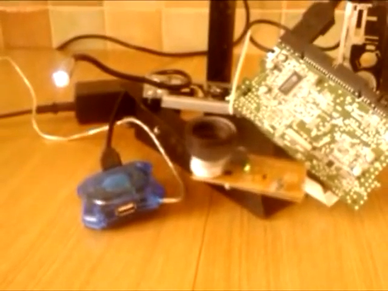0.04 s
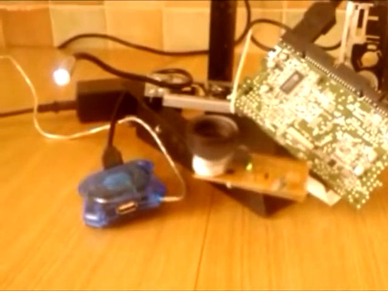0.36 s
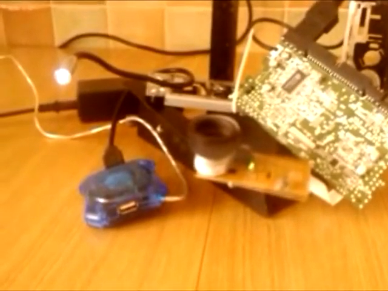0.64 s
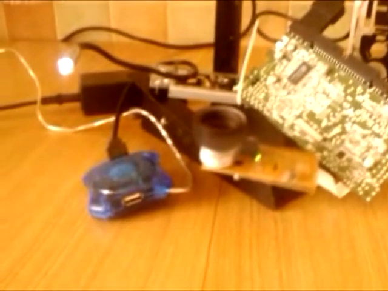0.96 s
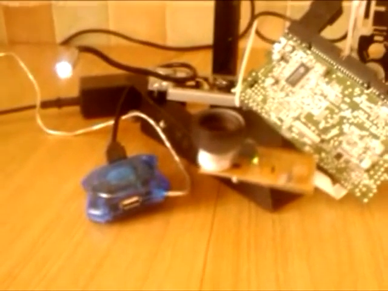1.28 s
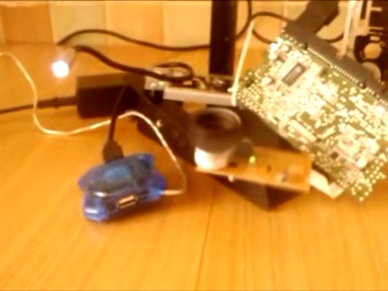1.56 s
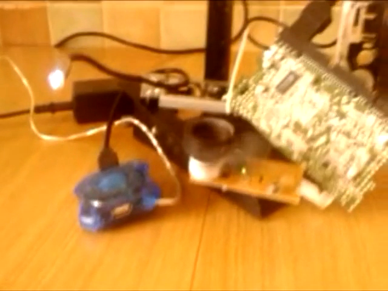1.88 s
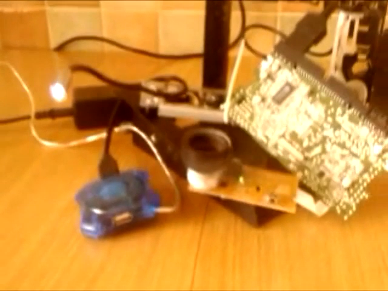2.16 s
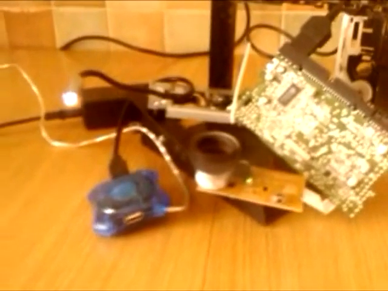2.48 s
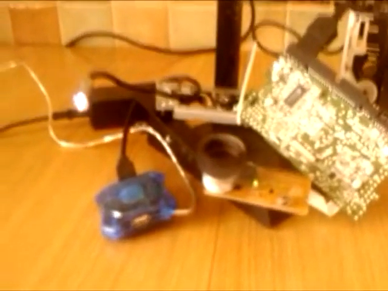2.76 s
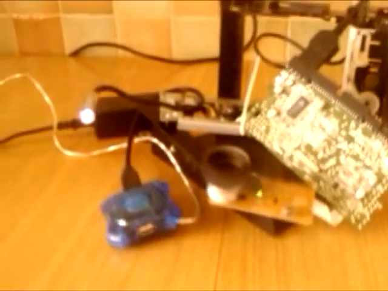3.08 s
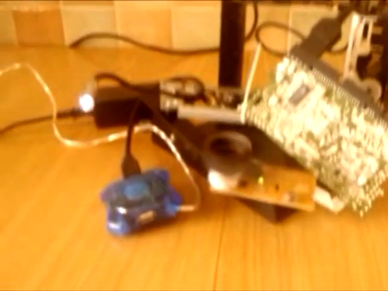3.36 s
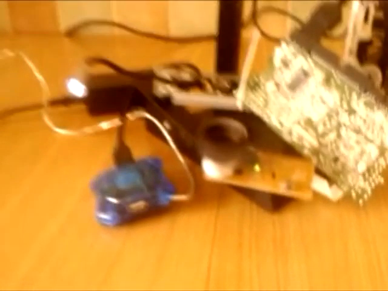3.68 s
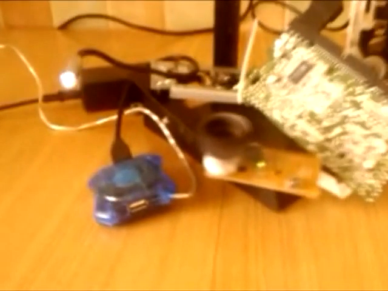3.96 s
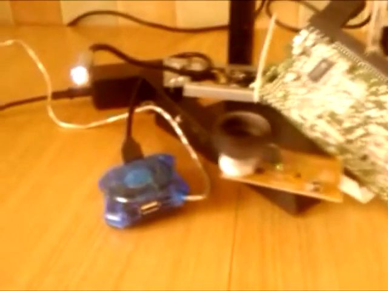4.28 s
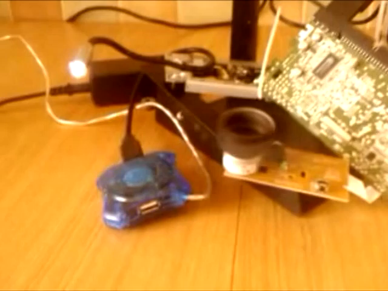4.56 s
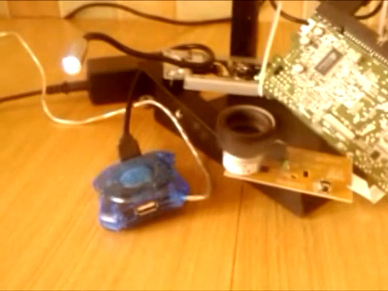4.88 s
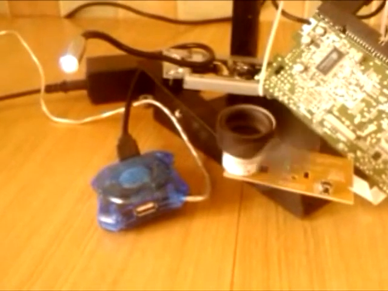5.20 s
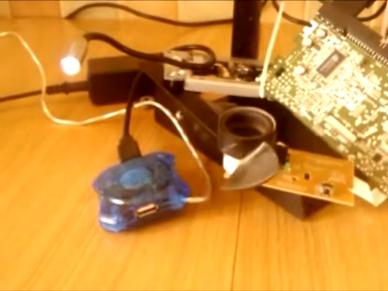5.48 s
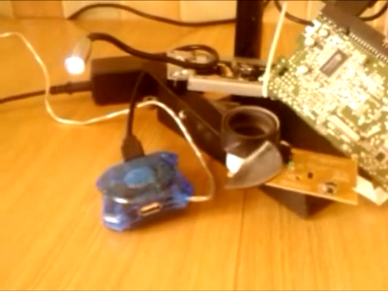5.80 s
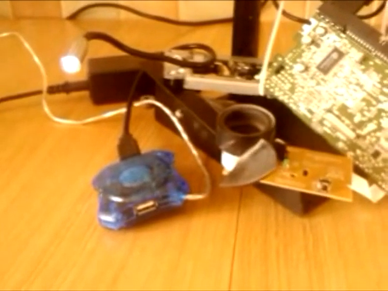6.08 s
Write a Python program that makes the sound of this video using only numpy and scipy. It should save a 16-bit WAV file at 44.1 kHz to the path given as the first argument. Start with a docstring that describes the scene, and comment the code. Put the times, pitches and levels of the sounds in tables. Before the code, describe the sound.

A small electric motor shakes a homemade gadget on a wooden table, making a fast, buzzing rattle of loose circuit boards, knocks from the frame and a low boom from the tabletop. It slows briefly to a soft whirr, then speeds up into a second rattling burst. It winds down and one light tick follows, leaving faint fan hum in a quiet room. The microphone sounds dull and crackles on the hardest knocks.

```python
"""A small motor with an off-centre weight shakes a homemade gadget on a wooden table: the frame hops and
knocks, loose boards chatter, and the case and table top boom. Near 2 s the motor slows to a soft whirr,
then speeds up for a second burst of rattling. After 4.5 s it winds down, and at 5.65 s the parts settle
with a light tick. Faint fan hum and room air lie under it all. The microphone hears little high treble,
and it overloads on the hardest knocks."""
import sys
import numpy as np
from scipy import signal
from scipy.fft import rfft, irfft, next_fast_len
from scipy.io import wavfile
from scipy.ndimage import uniform_filter1d

SR = 44100
rng = np.random.default_rng(int(sys.argv[2]) if len(sys.argv) > 2 else 0)


def transcribe(u):
    """Save the signal u as a 16-bit wav file named by the first command-line argument.

    u: samples, shape (n,) or (channels, n), limited to [-1, 1]; the rate is SR.
    q: integer samples, one column per channel.
    """
    v = np.clip(np.atleast_2d(u).T, -1, 1)
    q = np.round(v * 32767).astype(np.int16)
    wavfile.write(sys.argv[1], SR, q)


N = 274963
TIME = np.arange(N) / SR


# how fast the motor spins: (time [s], speed [turns/s])
MOTOR_SPEED = [(0, 35.1), (0.5, 34.7), (0.8, 36.2), (1.0, 34.5), (1.3, 36.2), (1.6, 34.3), (1.75, 18),
               (1.92, 6), (2.15, 13.3), (2.5, 19.4), (3.0, 27.1), (3.2, 27.4), (4.25, 31.5), (4.55, 14),
               (5.05, 11), (5.5, 3)]
def motor_spin():
    """The motor's speed, and the number of turns it has made so far."""
    speed = np.interp(TIME, *np.transpose(MOTOR_SPEED))
    return speed, np.cumsum(speed) / SR


# how hard the gadget shakes, one list per burst, 0 dB is full shaking: (time [s], level [dB])
SHAKE_LEVELS = [
    [(0, 2), (0.35, 0), (0.55, -1.5), (0.82, -0.5), (1.08, -2.5), (1.25, 0), (1.53, -2.5), (1.66, -13.5),
     (1.8, -22.5), (1.93, -43.5)],
    [(2.3, -34.5), (2.46, -14.5), (2.65, -8), (2.82, -2.5), (2.95, -8.5), (3.1, -5), (3.38, -3),
     (3.7, -5.5), (4.2, -5), (4.42, -16), (4.68, -41)],
]
# how hard the big landings hit: (time [s], boards [dB], frame [dB], case [dB], microphone crackle [dB])
HARD_KNOCKS = [(0.0837, 0, -20.5, -3.5, -32), (0.1695, -3.5, -4.5, -10.5, -39), (0.1924, -6, -6, -7, -38),
               (0.2296, 0, -10, -6.5, -22), (0.2808, 1, -11, -9.5, -44), (0.3431, -2, -15.5, -6.5, -44),
               (0.3684, -6.5, -8, -3.5, -39), (0.3965, -1.5, -7.5, -6.5, -41),
               (0.4564, -19.5, -6.5, -11.5, -42), (0.5482, -11, -9, -11, -50), (0.6275, -12, -7, -8.5, -38),
               (0.6824, -6.5, -17.5, -6.5, -45), (0.8004, -15, -7, -17.5, -53),
               (0.9378, -7, -25, -7.5, -39), (0.9946, -5.5, -12.5, -10.5, -34), (1.2196, -2, -12, -15, -28),
               (1.3359, -1.5, -6, -12.5, -39), (1.475, -2.5, -6.5, -10.5, -42),
               (1.6847, -13, -21.5, -31, -67), (1.741, -19, -24.5, -28, -73), (2.3238, -21, -39, -37, -73),
               (2.379, -15.5, -41, -32.5, -70), (2.4319, -16.5, -30, -30, -71),
               (2.5316, -12, -22.5, -25.5, -67), (2.6434, -16.5, -24.5, -13, -74),
               (2.7674, -11.5, -8.5, -10.5, -51), (2.8065, -10, -16, -22, -64),
               (2.8504, -18.5, -17, -11.5, -58), (3.0074, -11.5, -13, -12.5, -63),
               (3.039, -8.5, -13, -23, -62), (3.0774, -5.5, -12.5, -17.5, -61), (3.1153, -14, -8, -22, -60),
               (3.1423, -8, -9, -20, -45), (3.187, -4, -8.5, -18.5, -57), (3.2857, -5.5, -7.5, -10, -38),
               (3.3331, -2.5, -9.5, -13, -45), (3.3555, -9, -8.5, -14, -50), (3.4241, -8, -10, -28.5, -57),
               (3.4764, -6, -29, -18.5, -56), (3.5459, -0.5, -11.5, -18, -41),
               (3.6456, -6.5, -17, -20.5, -59), (3.703, -6, -12.5, -18, -62), (3.7704, -7, -23, -7, -60),
               (3.8367, -7, -25, -16, -67), (3.9721, -5.5, -12.5, -18.5, -50),
               (4.1085, -6, -10.5, -11, -43), (4.179, -5, -13, -15, -37), (4.2348, -30, -22, -11, -57),
               (4.3089, -10, -20, -15.5, -63), (4.374, -8.5, -18.5, -15.5, -66),
               (4.4796, -19, -32, -23.5, -74)]
def rattle(turns):
    """The spinning weight makes the gadget hop and chatter, which sets each of its parts ringing."""
    shaking_db = over_bursts(SHAKE_LEVELS)
    times, clack_db, clunk_db, thud_db, _ = np.transpose(HARD_KNOCKS)
    landings = hops(turns, shaking_db, times)
    clacks = impulses(times, clack_db) + landings
    clunks = impulses(times, clunk_db) + from_db(-6) * landings
    thuds = impulses(times, thud_db) + from_db(-4.5) * landings
    # the weight throws the loose parts against their stops twice a turn, one way harder
    angle = 2 * np.pi * turns
    swing = from_db(1.2 * np.cos(angle) + 3 * np.cos(2 * angle))
    chatter = from_db(-18 + 1.183 * shaking_db) * swing * tiny_taps(per_s=2400, spread_db=3)
    board_blows = blows(clacks, crack=7.5, settle_s=0.095, bounces_per_s=4000)
    board_force = from_db(10) * chatter + from_db(1) * board_blows
    frame_force = from_db(6.5) * chatter + blows(clunks, crack=11.1, settle_s=0.11, bounces_per_s=3000)
    case_force = from_db(5.5) * chatter + blows(thuds, crack=7.4, settle_s=0.094, bounces_per_s=3000)
    return (board_clatter(board_force) + frame_clunk(frame_force, clunks, shaking_db)
            + case_thud(case_force, thuds, shaking_db) + table_boom(case_force))


def hops(turns, shaking_db, knock_times, lead_turns=0.03, clear_s=0.018):
    """The frame lands once a turn, except where a hard knock falls close by."""
    count = np.floor(turns + lead_turns)
    at = np.flatnonzero(np.diff(count) > 0)
    limp_db = 1.5 * (-1) ** count[at]  # every other landing is stronger
    chance_db = 2.66 * rng.standard_normal(N)[:len(at)]
    db = -12 + shaking_db[at] + limp_db + chance_db
    free = np.abs(TIME[at, None] - knock_times).min(axis=1) > clear_s
    return impulses(TIME[at][free], db[free])


# notes the circuit boards ring at; a wider note dies sooner: (pitch [Hz], width [Hz], level [dB])
BOARD_NOTES = [(1360, 240, -9.5), (1809, 108, 0.5), (1926, 145, 1.5), (2135, 144, 2), (2208, 117, 1),
               (2693, 330, -3.5), (3005, 74, 0.5), (3040, 22, 0.5), (3156, 268, -2), (3457, 160, 2),
               (3590, 78, 2.5), (4363, 503, 1)]
def board_clatter(force):
    """The loose circuit boards ring high and briefly when struck."""
    return resonate(with_room(force), BOARD_NOTES)


# notes the frame rings at: (pitch [Hz], width [Hz], level [dB])
FRAME_NOTES = [(449, 73, -4), (529.6, 12, 2), (566.5, 21.4, -0.5), (675, 43, -2), (778.3, 47, -0.5),
               (814, 28, -1), (855, 40.3, -1), (967.5, 34.3, 0.5), (1069.6, 36, -6), (1151, 81, -1),
               (1188, 149, -7)]
def frame_clunk(force, hits, shaking_db):
    """The frame rings at a middle pitch, as strongly as it is shaken and hit."""
    loudness = ring_level(-17 + 0.99 * shaking_db, hits, hit_db=-7, fade_s=0.14)
    return loudness * evened(resonate(with_room(force), FRAME_NOTES), span_s=0.06)


# notes the case rings at: (pitch [Hz], width [Hz], level [dB])
CASE_NOTES = [(86, 78, -17.5), (175, 90, -12.5), (241.8, 35, -7), (275.5, 33.6, -2), (300.4, 19, 1.5),
              (335.7, 16.4, -0.5), (394.6, 35, -13)]
def case_thud(force, hits, shaking_db):
    """The case rings lower than the frame, and a little longer after each hit."""
    loudness = ring_level(-14.5 + shaking_db, hits, hit_db=-5, fade_s=0.19)
    return loudness * evened(resonate(with_room(force), CASE_NOTES), span_s=0.05)


# the table top's one low note: (pitch [Hz], width [Hz], level [dB])
TABLE_NOTE = [(128.9, 8, 2)]
# how loud it booms, one list per burst: (time [s], level [dB])
BOOM_LEVELS = [
    [(0, -25.5), (0.38, -30.5), (0.52, -15.5), (0.72, -34), (1.0, -18.5), (1.3, -19.5), (1.55, -25),
     (1.75, -29.5), (1.92, -50)],
    [(2.33, -39.5), (2.5, -29.5), (2.75, -39.5), (2.93, -21.5), (3.05, -31), (3.78, -29), (4.15, -17.5),
     (4.55, -27), (4.75, -58)],
]
def table_boom(force):
    """The shaken table top booms, swelling and fading through each burst."""
    return from_db(over_bursts(BOOM_LEVELS)) * evened(resonate(force, TABLE_NOTE), span_s=0.15)


# notes the motor's metal shell rings at: (pitch [Hz], width [Hz], level [dB])
SHELL_NOTES = [(317, 14, 2), (444, 84, -6), (772, 36, 5.5), (984, 170, -15), (1890, 60, -44),
               (2140, 120, -34), (3140, 160, -22)]
def whirr(speed, turns, full_turns_per_s=14.3, lag_turns=0.28):
    """The motor's brushes hiss and scrape over its spinning contacts six times a turn, ringing its shell."""
    scrape = from_db(1.4 * np.cos(12 * np.pi * turns)) * tiny_taps(per_s=5200, spread_db=5)
    shell = evened(filtered(resonate(scrape, SHELL_NOTES), 2, 3800), span_s=0.024)
    hiss = rms_one(filtered(rng.standard_normal(N), 2, [180, 4000], "band"))
    effort = np.minimum(speed / full_turns_per_s, 1)  # faster is louder, up to a limit
    speeding_up = 1.0 * (np.gradient(speed) > 0)
    driven_db = 2.5 * uniform_filter1d(speeding_up, size=2000)  # louder under power than coasting
    throb_db = 3.5 * np.cos(2 * np.pi * (turns - lag_turns))  # one throb a turn
    return from_db(-41 + driven_db + throb_db) * effort ** 2.35 * shell + from_db(-50.5) * effort * hiss


# notes the settling part rings at: (pitch [Hz], width [Hz], level [dB])
TICK_NOTES = [(168, 120, 2), (400, 200, 1), (900, 400, -8), (2240, 250, -6.5)]
def settling_tick(at_s=5.65):
    """One light tick as the parts come to rest."""
    tap = blows(impulses(at_s, db=-29), crack=10, settle_s=0.04, bounces_per_s=2300)
    return resonate(tap, TICK_NOTES)


# the tones in the fan's hum: (pitch [Hz], level [dB])
FAN_TONES = [(156.1, -87), (312.2, -63), (446.3, -63), (766, -87.5), (884, -76), (991, -80.5), (1912, -75)]
def fan_hum():
    """A fan hums with a few faint, steady tones."""
    return sum(from_db(db) * np.sqrt(2) * np.sin(2 * np.pi * (hz * TIME + rng.random()))
               for hz, db in FAN_TONES)


# how strong the room's noise is from low to high: (pitch [Hz], level [dB])
AIR_SHAPE = [(25, -11.5), (55, -16), (85, -9), (150, 0.5), (330, 1), (560, -8.5), (1200, -7.5),
             (2000, -12.5), (3400, -15.5), (4400, -14.5), (6500, -36)]
def room_air():
    """The air in the room makes a soft, low rush."""
    return from_db(-53.5) * rms_one(coloured(rng.standard_normal(N), AIR_SHAPE))


def with_room(x, fade_s=0.38, echo_db=-9):
    """Close walls and the table top add a short blur of echoes."""
    t = TIME[:SR // 2]
    tail = rng.standard_normal(len(t)) * from_db(-60 * t / fade_s) * (t > 0.004)
    return x + from_db(echo_db) * signal.fftconvolve(x, tail / np.linalg.norm(tail))[:N]


def blows(hits, crack, settle_s, bounces_per_s):
    """Each blow is one sharp hit, a quick scatter of taps and a dying flurry of bounces."""
    strength = dying(hits, settle_s) + from_db(-2.5) * dying(hits, fade_s=0.005)
    return crack * hits + strength * tiny_taps(bounces_per_s, spread_db=-1)


def tiny_taps(per_s, spread_db):
    """Tiny taps at random moments, some stronger than others."""
    sizes = from_db(spread_db * np.clip(rng.standard_normal(N), -2, 2)) * rng.choice([-1, 1], N)
    return rms_one(sizes * (rng.random(N) < per_s / SR))


def resonate(x, notes):
    """A struck part rings at all its notes at once; every other note is added upside down."""
    out = 0
    for k, (hz, width, db) in enumerate(notes):
        decay = np.exp(-np.pi * width / SR)
        feedback = [1, -2 * decay * np.cos(2 * np.pi * hz / SR), decay ** 2]
        ring = signal.lfilter([1, 0, -1], feedback, x + 1e-18)
        out = out + (-1) ** k * from_db(db) * (1 - decay ** 2) / 2 * ring
    return out


def ring_level(shaken_db, hits, hit_db, fade_s):
    """How loud a heavy part is: steady shaking plus the dying energy of each landing."""
    energy = from_db(shaken_db) ** 2 + dying((from_db(hit_db) * hits) ** 2, fade_s / 2)
    return uniform_filter1d(np.sqrt(energy), size=130)


def impulses(times, db):
    """One click of the given level at each time."""
    hits = np.zeros(N)
    hits[np.round(np.asarray(times) * SR).astype(int)] = from_db(db)
    return hits


def dying(hits, fade_s):
    """Give each click a tail that falls 60 dB in fade_s."""
    return signal.lfilter([1], [1, -from_db(-60 / (fade_s * SR))], hits + 1e-18)


def over_bursts(curves):
    """Join each burst's points into a level in dB, silent outside the bursts."""
    return np.max([np.interp(TIME, *np.transpose(rows), left=-120, right=-120) for rows in curves], axis=0)


def evened(x, span_s):
    """Even out loudness changes slower than span_s, keeping the quick ones."""
    size = int(span_s * SR)
    power = uniform_filter1d(uniform_filter1d(x * x, size), size)
    return x / np.sqrt(np.abs(power) + 1e-14)


def coloured(x, points):
    """Turn pitches up or down along a curve of (pitch [Hz], level [dB]) points."""
    hz, db = np.transpose(points)
    size = next_fast_len(N + 4096)
    pitches = np.maximum(np.arange(size // 2 + 1) * SR / size, 1)
    gain = from_db(np.interp(np.log(pitches), np.log(hz), db))
    return irfft(rfft(x, size) * gain, size)[:N]


def filtered(x, steepness, hz, keep="low"):
    """Keep the lows, the highs or a band between."""
    return signal.sosfilt(signal.butter(steepness, hz, keep, fs=SR, output="sos"), x)


def from_db(db):
    """Turn decibels into a number to multiply by."""
    return 10 ** (np.asarray(db) / 20)


def rms_one(x):
    """Scale a sound to an average power of one."""
    return x / np.sqrt(np.mean(x ** 2) + 1e-20)


def scene():
    """The spinning motor drives both the rattle and the whirr, in a quiet room."""
    speed, turns = motor_spin()
    motor = rattle(turns) + whirr(speed, turns)
    return (motor + room_air() + fan_hum() + settling_tick())[None]


def microphone_crackle():
    """A very short, bright crackle on each hard knock."""
    times, *_, crackle_db = np.transpose(HARD_KNOCKS)
    bursts = dying(impulses(times, crackle_db), fade_s=0.0088) * rng.standard_normal(N)
    bright = filtered(bursts, 3, 4800, "high")
    return from_db(9) * filtered(bright, 2, 6000)


# how well the microphone hears from low to high: (pitch [Hz], level [dB])
MICROPHONE_SHAPE = [(15, -17), (60, 0), (3550, 1), (3750, -4), (4000, -16), (4450, -15.5), (4720, -18),
                    (5000, -40), (6600, -34), (7350, -19.5), (7900, -33), (8400, -27), (9500, -36),
                    (15000, -40.5)]
def record(dry, ceiling=0.9, hardness=14, dull_hz=10000, cutoff_hz=15800):
    """The microphone squashes the highest peaks, adds crackle and faint hiss, and dulls the treble."""
    heard = coloured(dry[0], MICROPHONE_SHAPE)
    squashed = heard / (1 + np.abs(heard / ceiling) ** hardness) ** (1 / hardness)
    hiss = from_db(-82) * rms_one(signal.lfilter([1], [1, -0.75], rng.standard_normal(N)))
    dulled = filtered(squashed + microphone_crackle() + hiss, 1, dull_hz)
    return signal.sosfilt(signal.cheby2(14, 60, cutoff_hz, fs=SR, output="sos"), dulled)[None]


dry = scene()
out = record(dry)
transcribe(out)
```